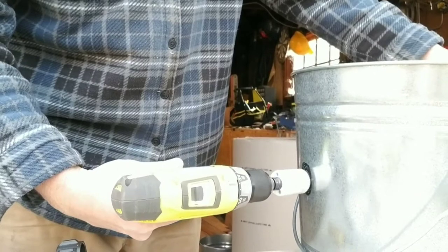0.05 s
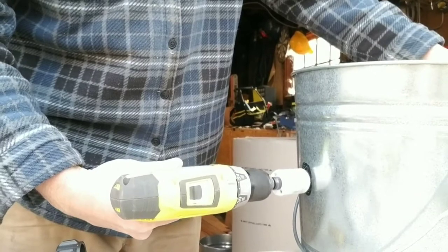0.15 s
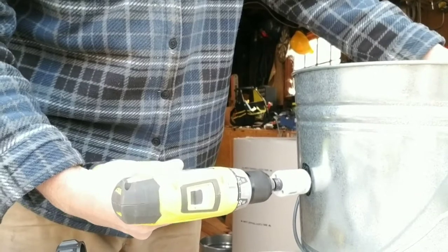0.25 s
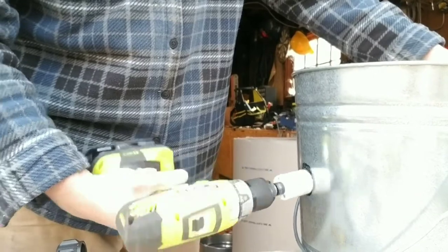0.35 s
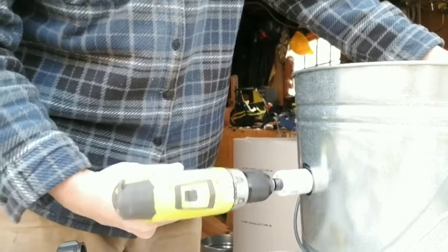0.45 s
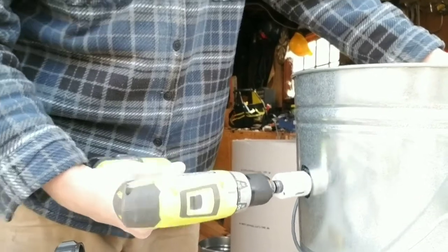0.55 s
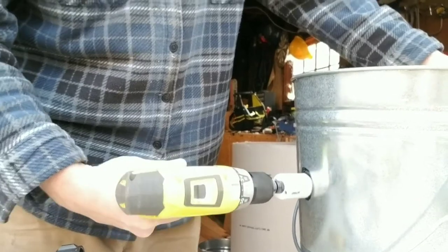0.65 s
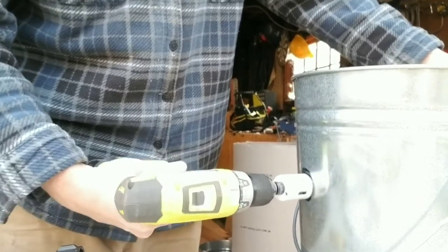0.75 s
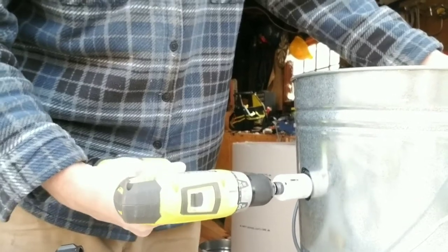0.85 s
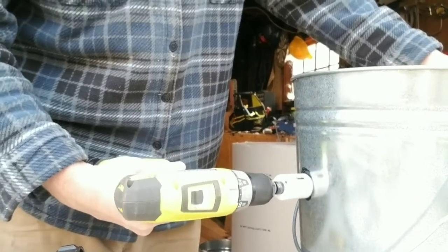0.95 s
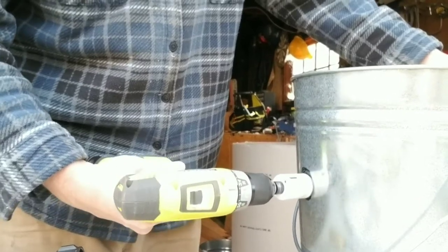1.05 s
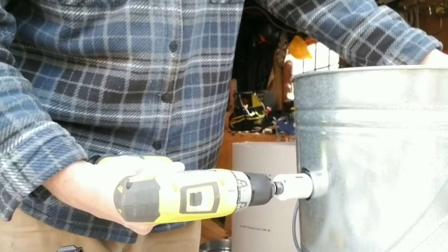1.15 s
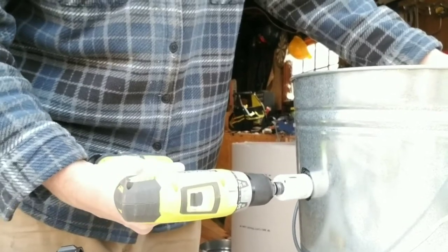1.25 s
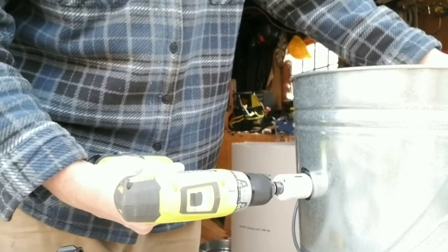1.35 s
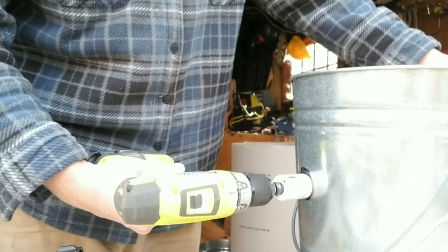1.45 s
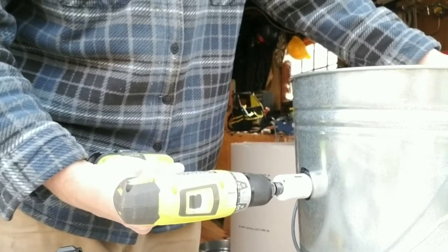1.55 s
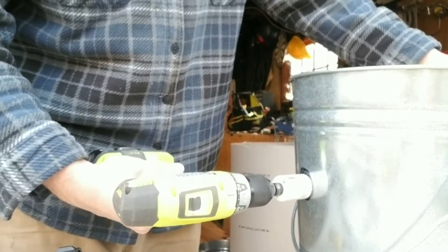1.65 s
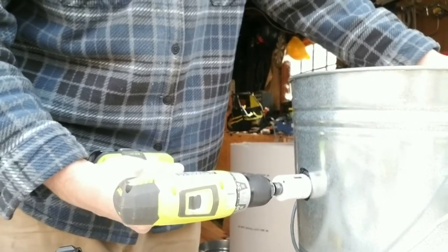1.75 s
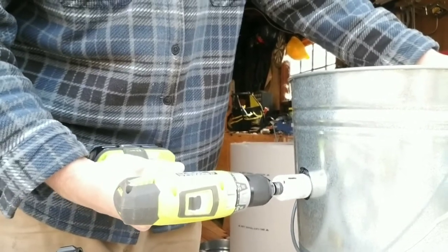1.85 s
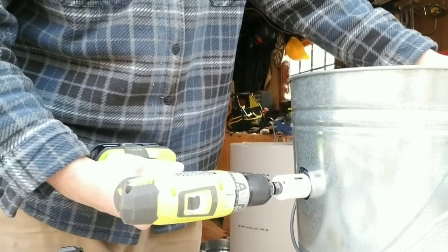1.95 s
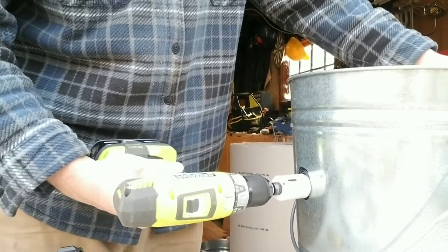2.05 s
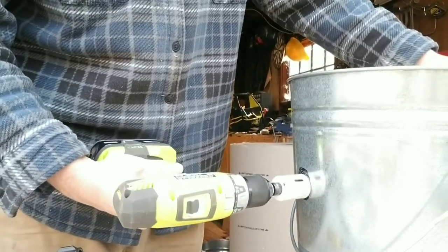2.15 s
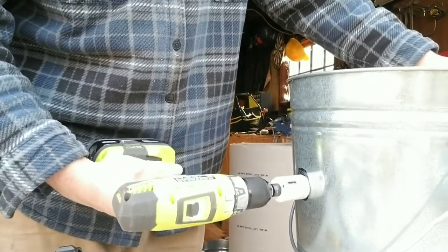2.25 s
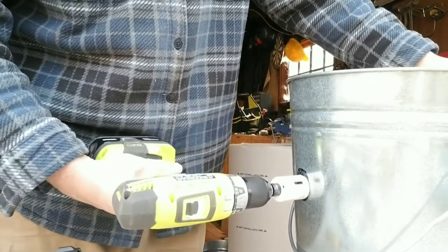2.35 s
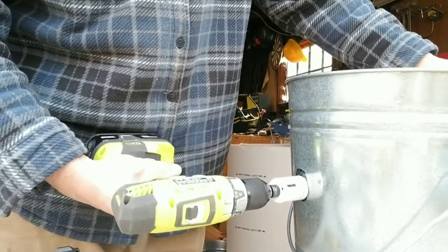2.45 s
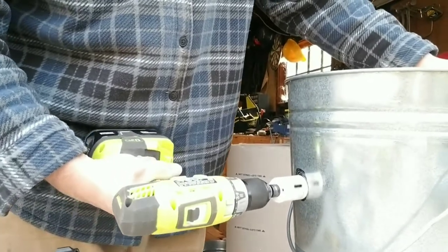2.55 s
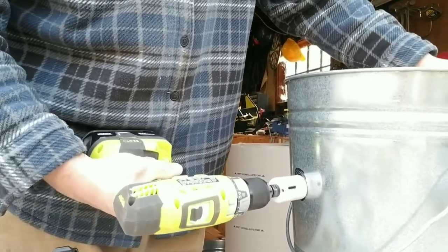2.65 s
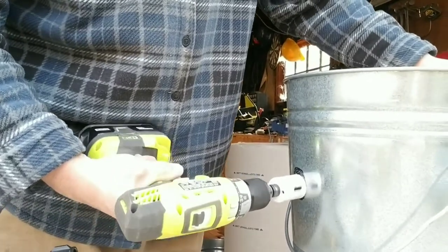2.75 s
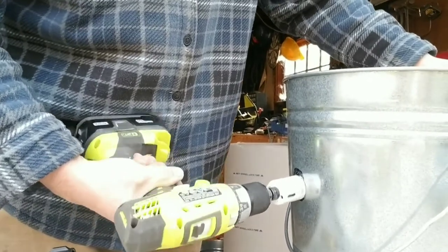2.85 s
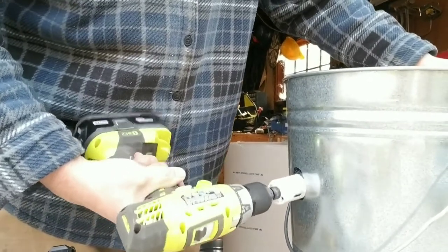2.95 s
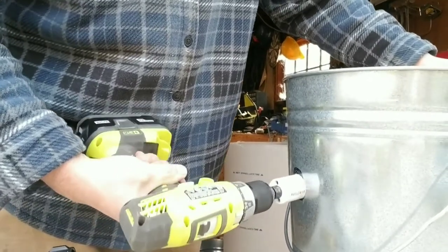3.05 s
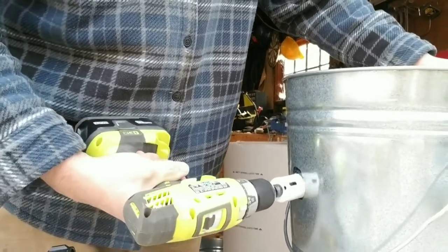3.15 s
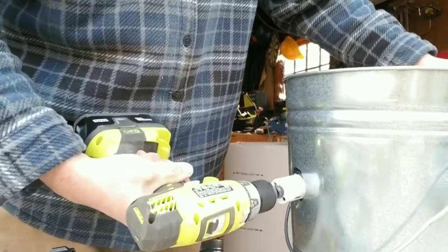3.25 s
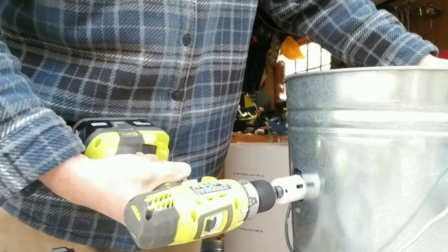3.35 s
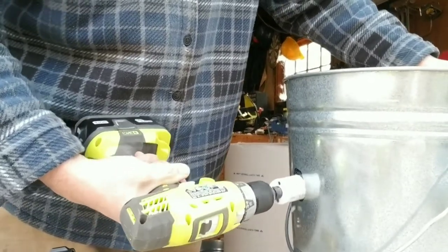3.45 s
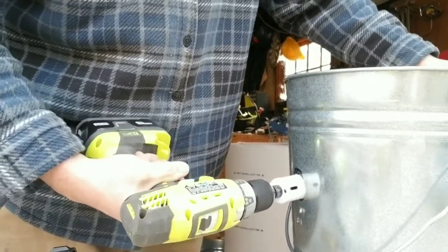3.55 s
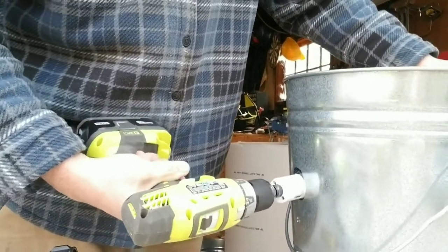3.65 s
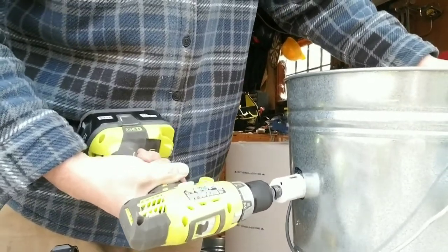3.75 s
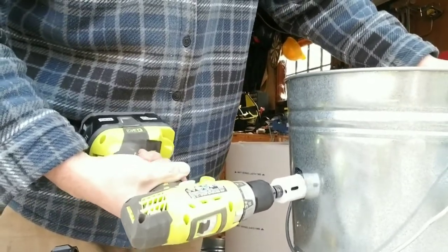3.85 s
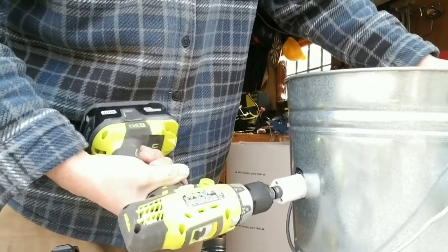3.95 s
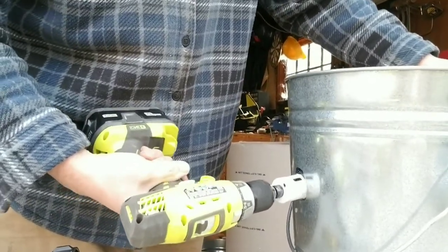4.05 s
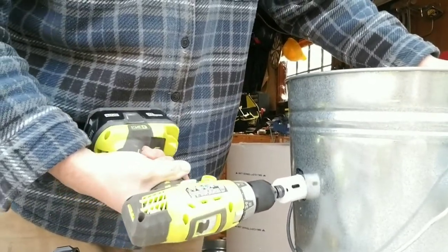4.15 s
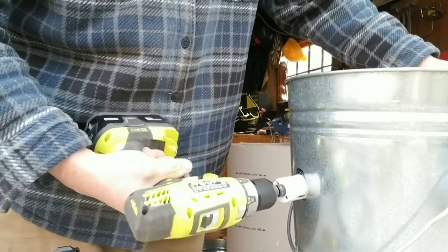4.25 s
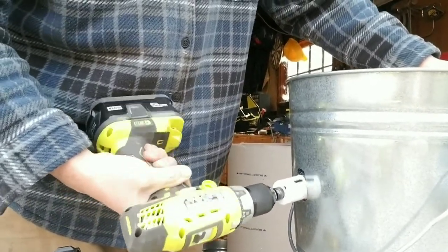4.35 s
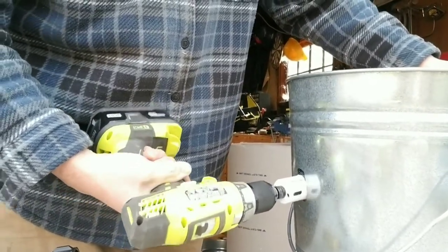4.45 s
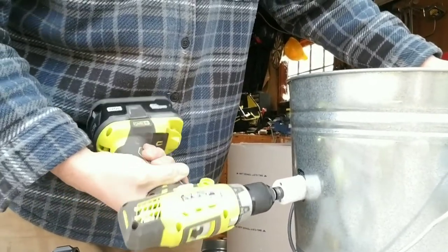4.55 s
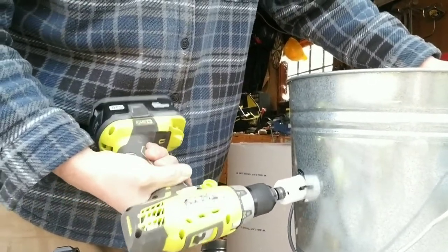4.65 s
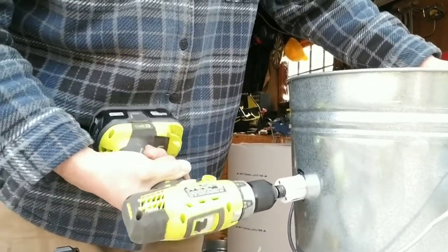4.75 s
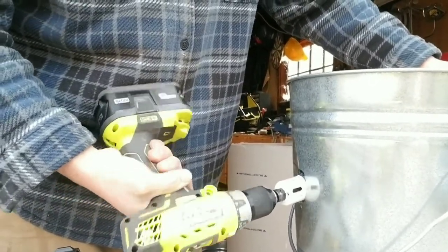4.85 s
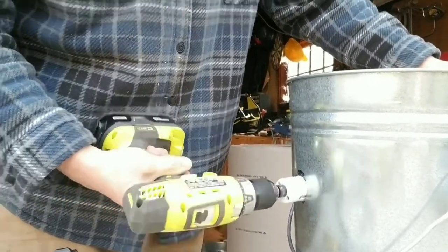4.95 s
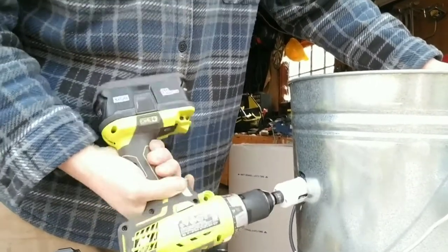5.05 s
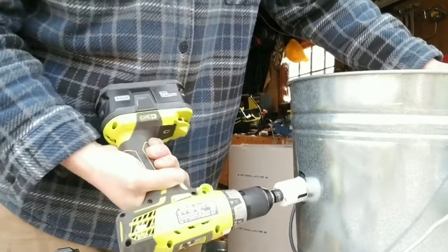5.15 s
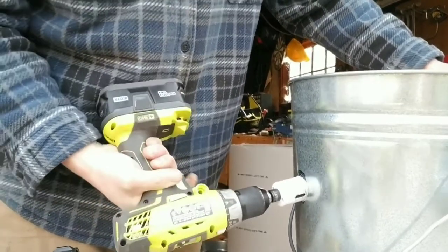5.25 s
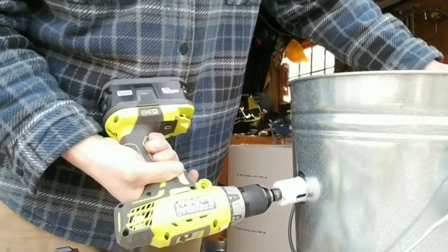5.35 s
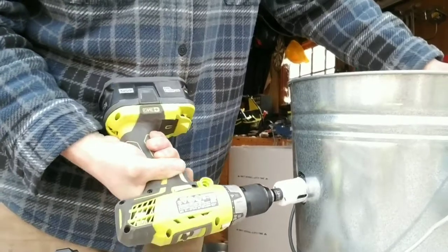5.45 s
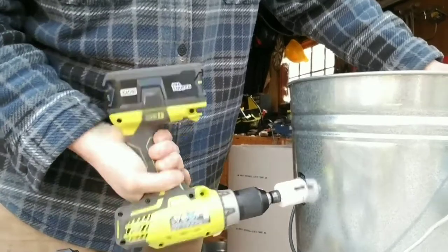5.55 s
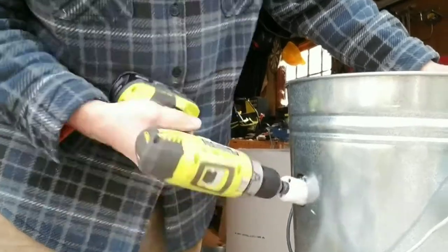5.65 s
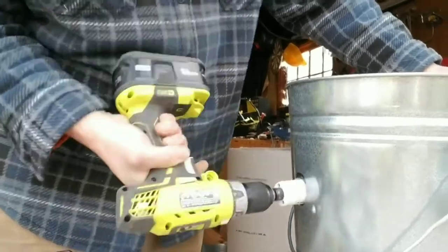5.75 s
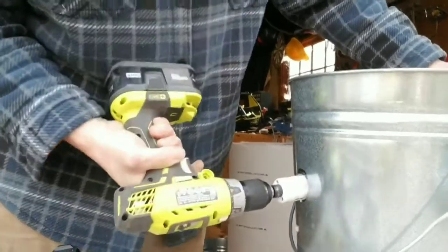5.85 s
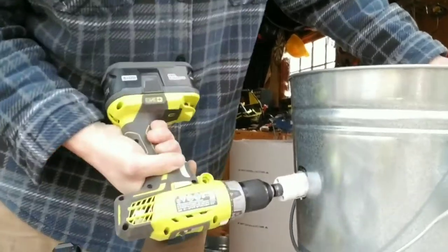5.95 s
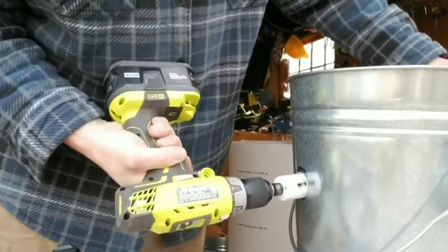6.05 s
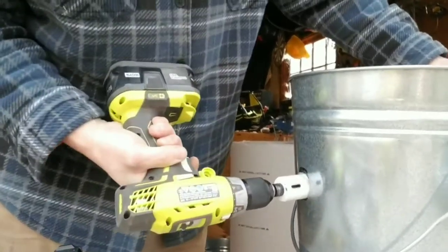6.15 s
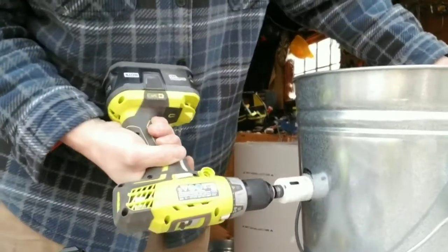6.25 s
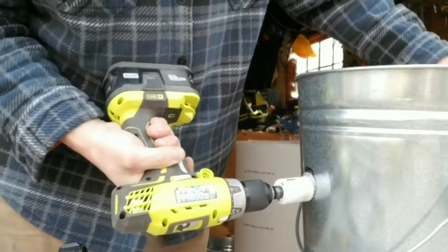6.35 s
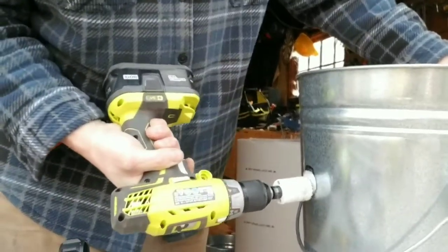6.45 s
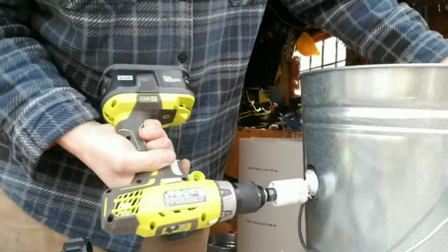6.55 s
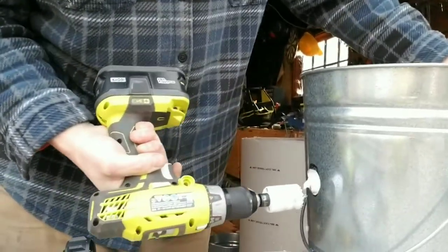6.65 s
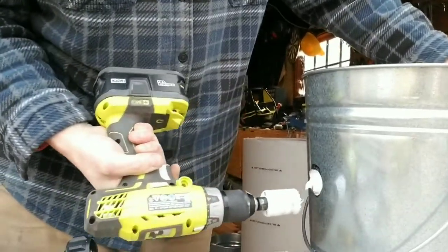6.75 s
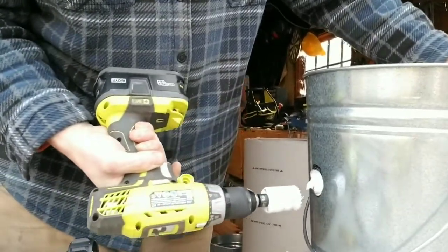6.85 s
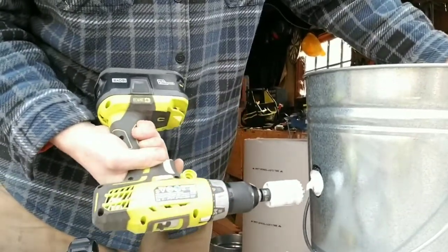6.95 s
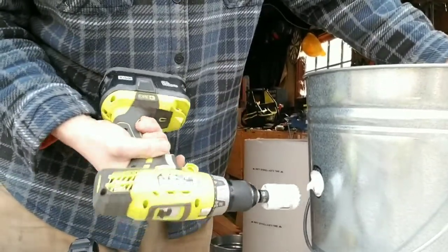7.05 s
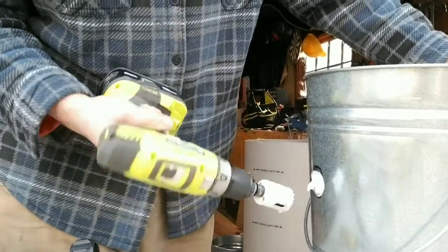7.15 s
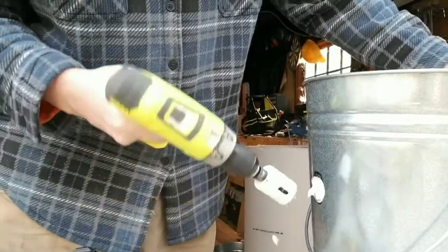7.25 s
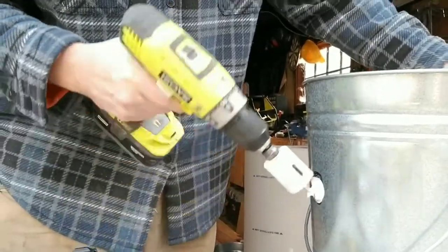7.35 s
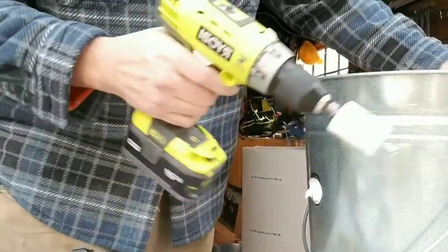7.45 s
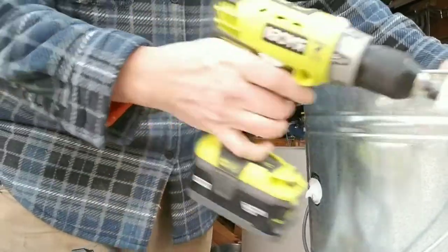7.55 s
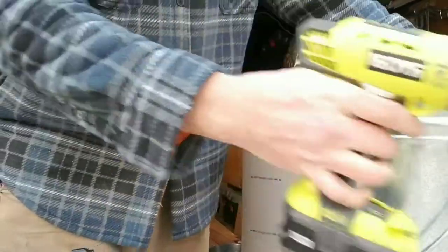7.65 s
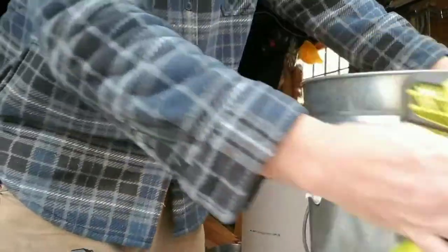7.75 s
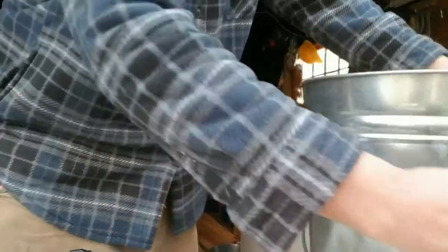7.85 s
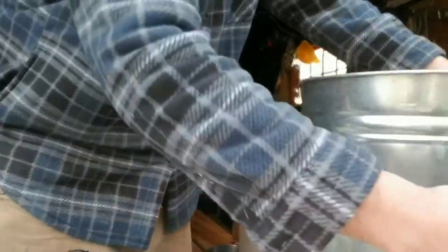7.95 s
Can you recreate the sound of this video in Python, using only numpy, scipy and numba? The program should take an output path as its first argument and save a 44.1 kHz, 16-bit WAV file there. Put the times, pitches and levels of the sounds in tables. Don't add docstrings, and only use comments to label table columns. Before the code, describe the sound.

A slow drill grinds through thin sheet metal in a small, fairly dry workshop, captured close in stereo. Brushes hiss, gears whine thinly and the bin booms and groans. Teeth begin snagging, banging and cracking in dense irregular clatter, then the tool coasts to a stop. Two brief bursts follow, the first with a sharp snag and rising whirr, then near quiet, light cloth rustle and a weighty set-down thump.

```python
import sys
import numpy as np
from scipy import signal
from scipy.fft import rfft, irfft
from scipy.io import wavfile
from scipy.ndimage import uniform_filter1d
from numba import njit

SR = 44100
rng = np.random.default_rng(int(sys.argv[2]) if len(sys.argv) > 2 else 0)


def to_wav(sig):
    pcm = np.clip(np.atleast_2d(sig), -1, 1) * 32767
    pcm = np.round(pcm).astype(np.int16)
    wavfile.write(sys.argv[1], SR, pcm.T)


def volts(x):
    e = np.asarray(x, float) / 20
    return 10 ** e


N = 353241

# frequency in Hz, level in dB per Hz.
SHEET = [(76, -43), (130, 0), (188, -9.5), (226, -4.5), (259, -7), (301, 3), (350, -4.5), (533, -4),
         (912, -19), (1100, -17), (1430, -32.5), (2420, -120)]


def unit(x):
    return x / np.sqrt(np.mean(x ** 2))


def colour(x, spectrum):
    hz, db = np.transpose(spectrum)
    bins = np.maximum(np.fft.rfftfreq(N, 1 / SR), 1)
    gain_db = np.interp(np.log(bins), np.log(np.maximum(hz, 1)), db)
    return irfft(rfft(x) * volts(gain_db), N)


def walk(rate):
    hold = int(SR / rate)
    steps = np.repeat(rng.standard_normal(N // hold + 1), hold)
    return unit(uniform_filter1d(uniform_filter1d(steps, hold), hold)[:N])


def curves(table):
    s, *columns = np.transpose(table)
    return [np.interp(np.arange(N) / SR, s, c, left=-120, right=-120) for c in columns]


@njit
def rings(start, hz, t60, size, turn, rise_s):
    out = np.zeros(N)
    hold = np.exp(-1 / (rise_s * SR))
    for k in range(len(start)):
        z = size[k] * np.exp(1j * turn[k])
        p = np.exp(2j * np.pi * hz[k] / SR - np.log(1000) / (t60[k] * SR))
        lack = 1.
        for i in range(max(int(start[k] * SR), 0), min(int((start[k] + t60[k]) * SR), N)):
            out[i] += z.imag * (1 - lack)
            z, lack = z * p, lack * hold
    return out


def grit(per_s, spread_db):
    hit = rng.random(N) < per_s / SR
    size = volts(spread_db * np.minimum(rng.exponential(size=N), 3.5))
    return unit(hit * rng.standard_normal(N) * size)


def resonate(x, modes, swell_db, rate):
    out = 0
    for hz, width, db in modes:
        b, a = signal.iirpeak(hz, hz / width, fs=SR)
        out = out + volts(db + swell_db * walk(rate)) * unit(signal.lfilter(b, a, x))
    return unit(out)


def puffs(table, attack_s, decay_s):
    t = np.arange(int(.1 * SR)) / SR
    rows = np.array(table)
    marks = np.zeros(N)
    np.add.at(marks, (rows[:, 0] * SR).astype(int), volts(rows[:, 1]))
    return signal.fftconvolve(marks, (1 - np.exp(-t / attack_s)) * np.exp(-t / decay_s))[:N]


def tones(table, edge_s, waver):
    t, out = np.arange(N) / SR, 0
    drift = np.cumsum(waver * walk(60)) / SR
    for s, length, hz, db in table:
        gate = np.clip(np.minimum(t - s + edge_s, s + length + edge_s - t) / (2 * edge_s), 0, 1)
        out = out + volts(db) * gate * np.sin(2 * np.pi * hz * (t + drift))
    return out


def shop():
    # frequency in Hz, level in dB per Hz.
    room_tone = [(15, -46), (25, -1.5), (76, -0.5), (145, -8), (175, -3.5), (200, -14), (308, -19),
                 (426, -24), (474, -24.5), (514, -27.5), (558, -22), (1320, -28), (1640, -29.5),
                 (2530, -46.5), (15900, -73)]
    # frequency in Hz, side over mid in dB.
    room_width = [(60, -28), (200, -13), (700, 0.5), (15000, 1.5)]
    mid, side = (colour(rng.standard_normal(N) * volts(0.65 * walk(0.93)), room_tone) for _ in range(2))
    return volts(-45) * np.array([mid, colour(side, room_width)]) / np.std(mid)


def boom_db(scrape_db):
    # time in seconds, level in dB.
    jolts = [(.03, -21.5), (.17, -26), (.27, -27.5), (.42, -25.5), (.54, -27.5), (.68, -28.5), (.78, -35.5),
             (.92, -27), (1.02, -24.5), (1.14, -25.5), (1.22, -25), (1.46, -32.5), (1.55, -30.5),
             (1.67, -27.5), (1.79, -26.5), (1.97, -27.5), (2.07, -29.5), (2.31, -33), (2.51, -28.5),
             (2.67, -31), (2.87, -26.5), (3.01, -30), (3.13, -26.5), (3.26, -33), (3.4, -29), (3.6, -34),
             (3.74, -27.5), (3.86, -30.5), (3.97, -28), (4.11, -22), (4.3, -26), (4.41, -25), (4.56, -27),
             (4.62, -26.5), (4.72, -30.5), (4.91, -23.5), (4.99, -24), (5.55, -27.5), (5.67, -26),
             (6.2, -36)]
    rise_db_s, sag_db_s, over_scrape_db = 200, 73, 7.5
    t = np.arange(N) / SR
    swells = [db - np.where(t < s, rise_db_s * (s - t), sag_db_s * (t - s)) for s, db in jolts]
    rest = -40 - 15 * np.abs(t - 5.9)
    return np.maximum(np.minimum(np.max(swells, axis=0), scrape_db + over_scrape_db), rest)


def drone(db, scrape_db):
    # time in seconds, lowest mode in Hz.
    boom_hz = [(0, 100), (1.0, 96), (2.5, 98), (3.1, 90), (4.6, 98), (5.0, 90), (5.8, 88), (6.2, 78),
               (6.9, 76)]
    hz = np.interp(np.arange(N) / SR, *np.transpose(boom_hz))
    swell = volts(1.8 * walk(30))
    mode = swell * np.sin(2 * np.pi * np.cumsum(hz * (1 + 0.035 * walk(14))) / SR)
    rumble = colour(rng.standard_normal(N),
                    [(20, -38.5), (40, -12.0), (60, 25.0), (80, 20.5), (130, 21.0), (200, -38.5)])
    rumble_gain = volts(0.5 * db + 0.32 * scrape_db - 13.0) * (db > -70)
    return volts(db + 2.5) * mode + rumble_gain * unit(rumble)


def stick_db(bites):
    stick_s = .012
    held = np.zeros(N)
    held[((bites[:, 0] - stick_s / 2) * SR).astype(int)] = 1
    return -9 * np.minimum(np.convolve(held, np.hanning(int(stick_s * SR)), "same"), 1)


def scrape(db):
    # frequency in Hz, width in Hz, level in dB.
    panel = [(235.3, 10, 1.5), (275, 130, 5), (339, 81, 2), (420, 68, 3.5), (490, 47, -16.5),
             (560, 59, -24), (690, 40, -20), (774, 13, -20)]
    nicks = grit(2500, 1.67) * volts(1.34 * walk(24.88))
    ringing = resonate(nicks, panel, 3.2, 9)
    return volts(db + .5) * unit(unit(colour(nicks, SHEET)) + volts(-3.5) * ringing)


def motor(housing_db, hiss_db):
    # time in seconds, pitch in Hz, level in dB.
    mesh = [
        (0, 4180, -36),
        (.17, 4200, -40.5),
        (.3, 3780, -56.5),
        (.55, 4000, -52),
        (1.1, 4040, -56),
        (1.3, 3980, -43),
        (1.7, 3845, -42.5),
        (2.4, 3850, -41.5),
        (2.7, 3660, -44),
        (3, 3830, -50.5),
    ]
    # frequency in Hz, width in Hz, level in dB.
    shell_modes = [(1370, 80, -8), (1505, 160, -0.5), (2034, 70, -3.5), (2185, 110, -2), (2400, 90, -3),
                   (2580, 140, -2)]
    # frequency in Hz, level in dB per Hz.
    housing_spectrum = [(600, -33.5), (950, -9.5), (1170, -2), (1500, 3), (1800, -3), (2100, 2), (2600, 1),
                        (3000, -3.5), (3500, -14.5)]
    # frequency in Hz, level in dB per Hz.
    hiss_spectrum = [(2700, -17.5), (3200, -2), (3480, -0.5), (3830, 1.5), (4400, -4), (5100, -1.5),
                     (5400, -3), (5550, -8.5), (5800, -4), (6450, -5.5), (8150, -4), (8900, -8.5),
                     (11600, -4.5), (15800, -6), (16300, -40)]
    t = np.arange(N) / SR
    wobble_db = 0.64 * np.sin(2 * np.pi * 9.5 * t + 3.1 * walk(1.98)) + 0.61 * walk(30)
    gears = grit(6000, 0.78)
    shell = resonate(gears, shell_modes, 5.5, 14)
    housing = volts(housing_db) * unit(unit(colour(gears, housing_spectrum)) + volts(-6.5) * shell)
    hiss = volts(hiss_db - 1.5) * unit(colour(grit(15000, 0.4), hiss_spectrum))
    hz, db = curves(mesh)
    waver = .006 * np.minimum(t / .6, 1) * walk(60) + .001 * walk(40)
    turn = 2 * np.pi * np.cumsum(hz * (1 + waver)) / SR
    first_stage = volts(db + 1.1 * walk(15)) * np.sin(turn)
    slower_stage = (t > .5) * volts(db - 1.5 + 3.0 * walk(7.95)) * np.sin(.828 * turn)
    return volts(wobble_db) * (housing + hiss) + first_stage + slower_stage


def groans():
    # start in seconds, length in seconds, pitch in Hz, level in dB.
    binds = [(.02, 0.24, 337, -32.5), (5.505, 0.015, 240, -13), (5.88, 0.012, 197, -27.5),
             (5.9, 0.015, 146, -28), (5.78, .02, 230, -36.5), (5.835, .01, 750, -45), (.245, .02, 500, -19),
             (.76, .03, 245, -23), (1.43, .04, 220, -22), (1.72, 0.14, 232, -28), (.3, 0.023, 290, -15),
             (.41, 0.045, 305, -16.5), (.51, 0.054, 292, -17.5), (.63, 0.04, 245, -24),
             (1.63, 0.034, 230, -19), (2.705, 0.017, 233, -11), (2.845, 0.043, 231.3, -14.5),
             (3.94, 0.023, 300, -14), (4.385, 0.022, 288.5, -13.5), (4.825, 0.053, 246, -13),
             (4.895, 0.022, 115, -12.5), (4.88, .02, 250, -19), (4.77, .012, 225, -18),
             (4.788, .014, 215, -16), (4.625, .04, 225, -20), (4.855, .015, 190, -18),
             (3.885, .02, 300, -18), (.03, .1, 165, -36), (1.05, .05, 300, -25), (1.95, .04, 430, -25),
             (4.7, .04, 420, -22.5), (4.725, 0.028, 290, -19), (.66, 0.043, 235, -23.5),
             (1.25, .05, 400, -25), (1.9, .05, 330, -25), (3.62, .06, 290, -22.5),
             (4.975, 0.021, 194, -19.5)]
    return tones(binds, 0.013, 0.025)


def teeth():
    # time in seconds, peak in dB, ring in Hz, edge crack from about 700
    # Hz up in dB re peak.
    hard_catches = [(2.7, -6, 440, -11), (2.788, -8.5, 316, -3.5), (2.868, -7, 710, -2),
                    (2.91, -6, 447, -0.5), (2.927, -4, 590, -3.5), (2.992, -1.5, 599, -14.5),
                    (3.009, -6, 398, -5), (3.037, -3.5, 640, -5.5), (3.086, -8.5, 580, -4),
                    (3.146, -7, 401, -2), (3.174, -17.5, 504, 4), (3.601, -8.5, 330, -7.5),
                    (3.617, -8.5, 406, -6), (3.739, -8.5, 715, -16), (3.798, -3, 748, -10.5),
                    (3.851, -10.5, 613, -6), (3.98, -6.5, 318, -13.5), (4.027, -3.5, 690, -8),
                    (4.068, -8.5, 490, -7), (4.109, -6.5, 690, -11), (4.162, -10.5, 620, -5),
                    (4.24, 0.5, 483, -8), (4.299, 0, 814, -7.5), (4.352, -2.5, 720, -8),
                    (4.416, -5, 576, -12.5), (4.464, -1, 676, -10.5), (4.657, -1.5, 606, -13.5),
                    (4.772, -7, 620, -7), (4.819, -5.5, 260, -7), (4.905, -6.5, 460, -7)]
    snags = [(0.254, -11, 477, -15.5), (3.295, -12.5, 474, -13), (4.976, -12.5, 520, -7),
             (5.054, -27.5, 185, -12.5), (5.501, -8, 260, -9.5), (5.516, -4, 860, -5),
             (5.634, -12.5, 466, -20), (5.653, -12, 542, -21), (5.696, -10.5, 520, -13.5),
             (5.44, -37, 400, -4), (5.575, -18, 600, -15), (5.877, -30.5, 330, -25), (6.128, -41, 490, -7),
             (6.171, -30.5, 470, 3), (6.215, -26.5, 450, -2), (6.238, -19, 432, -11.5),
             (6.268, -33, 290, -12)]
    # time in seconds, peak
    # in dB, ring in Hz.
    lesser_teeth = [(2.719, -9, 263), (2.741, -13.5, 462), (2.775, -9.5, 489), (2.814, -12.5, 315),
                    (2.827, -12.5, 635), (2.841, -11, 221), (2.879, -10, 266), (2.898, -3, 457),
                    (2.948, -9, 559), (2.958, -12.5, 608), (3.052, -12.5, 231), (3.069, -19.5, 538),
                    (3.107, -15.5, 344), (3.128, -7.5, 633), (3.197, -9, 298), (3.222, -15.5, 479),
                    (3.361, -17.5, 400), (3.424, -19, 306), (3.458, -19.5, 624), (3.489, -16.5, 403),
                    (3.5, -12.5, 296), (3.553, -20, 500), (3.565, -21.5, 484), (3.641, -18, 290),
                    (3.665, -18.5, 452), (3.685, -17, 446), (3.72, -15.5, 360), (3.75, -15, 285),
                    (3.771, -15.5, 812), (3.784, -10.5, 759), (3.817, -11, 479), (3.834, -9, 436),
                    (3.867, -7.5, 802), (3.885, -7, 576), (3.922, -6, 360), (3.94, -11.5, 450),
                    (3.963, -12.5, 322), (3.991, -8.5, 425), (4.013, -23, 645), (4.041, -9, 436),
                  (4.082, -12, 446), (4.123, -6, 274), (4.137, -12, 425), (4.179, -9.5, 462),
                  (4.189, -18.5, 495), (4.202, -13, 672), (4.219, -8.5, 398), (4.259, -0.5, 624),
                  (4.278, -1, 640), (4.316, -6.5, 290), (4.338, -6, 872), (4.387, -4.5, 495),
                  (4.402, -1, 349), (4.427, -12, 651), (4.449, -12, 672), (4.485, -7, 436),
                  (4.502, -8.5, 662), (4.515, -6.5, 662), (4.53, -8, 834), (4.549, -8, 317),
                  (4.565, -4, 430), (4.58, -13, 317), (4.593, -4.5, 220), (4.616, -7.5, 274),
                  (4.634, -2, 290), (4.675, -4.5, 441), (4.688, -9.5, 484), (4.699, -8.5, 392),
                  (4.712, -3.5, 317), (4.73, -4, 506), (4.748, -11, 436), (4.76, -13, 220),
                  (4.789, -4, 285), (4.806, -25, 484), (4.839, -4.5, 242), (4.861, -7.5, 220),
                  (4.881, -9.5, 279), (4.896, -5.5, 312), (4.92, -8, 473), (4.931, -17, 586),
                  (4.961, -18, 220)]
    s, db, hz = np.transpose(lesser_teeth)
    edge_db = -9.0 + 2.5 * np.clip(rng.standard_normal(len(s)), -2, 2)
    return np.concatenate([hard_catches + snags, np.transpose([s, db - 3.0, hz, edge_db])])


def catches(bites):
    # frequency in Hz, level in dB re edge, t60 in seconds.
    edge_rings = [(800, 7, .013), (1080, 1, .01), (1433, -1, 0.017)]
    s, db, hz, edge_db = bites.T
    chance = rng.random((len(s), 6)).T
    half_turn = np.pi + 0 * s
    thump = rings(s + 0.00054, 235 + 30 * chance[5], 0.031 + 0 * s, volts(db - 5.5), half_turn, 0.00076)
    snap_back = rings(s + .0012, 520 + 260 * chance[4], 0.0066 + 0 * s, volts(db - 3.0), half_turn, 0.00018)
    out = thump + snap_back
    for k, (ratio, mode_db, cycles) in enumerate([(1.0, -1.5, 14.5), (1.5, -11.0, 10.0)]):
        pitch = hz * ratio * (0.961 + 0.089 * chance[k])
        phase = 2 + 2 * chance[k + 2]
        out = out + rings(s - .001, pitch, cycles / pitch, volts(db + mode_db), phase, 0.00048)
    for ring_hz, ring_db, t60 in edge_rings:
        pitch = ring_hz * (0.862 + 0.22 * chance[5])
        out = out + rings(s + .0008, pitch, t60 + 0 * s, volts(db + edge_db + ring_db), half_turn, 0.0003)
    shudder = puffs(bites, 0.0023, 0.0056) * unit(colour(grit(3000, 2.6), SHEET))
    edge = unit(colour(rng.standard_normal(N), [(450, -35.0), (780, 8.0), (1000, 6.5), (1450, 1.5),
                                                (2500, -5.0), (6000, -8.5), (15000, -42.5)]))
    crack = puffs(np.transpose([s, db + edge_db]), 0.0012, 0.0034) * edge
    return out + volts(-9) * shudder + volts(-4.5) * crack


def spits():
    # time in seconds, peak in dB.
    bursts = [(0.2594, -16), (2.8973, -14.5), (3.01, -15.5), (3.128, -13.5), (3.146, -28.5),
              (3.2944, -26.5), (3.6022, -18), (3.948, -12.5), (4.1026, -17), (4.2674, -12), (4.2975, -24),
              (4.3874, -16), (4.556, -14.5), (4.573, -17.5), (4.8978, -17.5), (5.1794, -46), (5.5145, -10),
              (6.2183, -33.5)]
    bright = unit(colour(rng.standard_normal(N), [(2500, -0.5), (5000, -6.0), (9000, -13.5), (16000, -11.0)]))
    return volts(2) * puffs(bursts, 0.0037, 0.0067) * bright


def squeals():
    # start in seconds, length in seconds, pitch in Hz, level in dB.
    thin_tones = [
        (3.957, .06, 11060, -40),
        (4.135, .065, 11290, -41),
        (4.475, .06, 11300, -45),
        (5.005, .055, 11200, -61),
        (5.125, .055, 7757, -67),
        (5.125, .055, 15509, -64),
        (5.72, .07, 11200, -60),
    ]
    return tones(thin_tones, .004, .001)


def whirr():
    # time in seconds, pitch in Hz, level in dB.
    spin_up = [
        (5.57, 1758, -51),
        (5.6, 1900, -39.5),
        (5.63, 2150, -31),
        (5.655, 2350, -38),
        (5.69, 2610, -45),
    ]
    hz, db = curves(spin_up)
    turn = 2 * np.pi * np.cumsum(hz * (1 + .03 * walk(150))) / SR
    return volts(db + 3.0 * walk(120)) * np.sin(turn)


def sleeve():
    # time in seconds, level in dB.
    rustle = [(6.5, -80), (7.25, -83), (7.31, -74), (7.42, -68.5), (7.52, -67), (7.58, -74), (7.69, -69),
              (7.834, -70), (7.864, -56), (7.904, -65), (8.0, -68)]
    # time in seconds, peak in dB.
    ticks = [(6.3, -52), (6.345, -54), (6.39, -54), (6.43, -56), (6.555, -62), (6.69, -60), (6.715, -60.5),
             (7.365, -59), (6.81, -60), (7.43, -64), (7.49, -61), (7.51, -59), (7.6, -64), (7.655, -63),
             (7.69, -64), (7.725, -61), (7.925, -55)]
    cloth = unit(colour(grit(5000, 2.0), [(1500, 6.5), (3000, 4.0), (3350, 6), (3700, -1.5),
                                          (8000, -4.5), (16000, -2.5)]))
    tick = unit(colour(rng.standard_normal(N), [(400, 0.5), (1500, 6), (4000, -8), (8000, -9.5), (16000, -19.5)]))
    return volts(curves(rustle)[0] + 1.5 * walk(25)) * cloth + puffs(ticks, .001, .006) * tick


def set_down():
    # time in seconds, peak in dB.
    landings = [
        (6.688, -36),
        (7.682, -38),
        (7.856, -4.5),
        (7.865, -15),
        (7.925, -27),
    ]
    # frequency in Hz, level in dB, t60 in seconds.
    bench = [(62.7, -13, 0.26), (118, 5.5, 0.03), (149, -5, 0.04), (244, -8.5, 0.088), (330, -12.5, 0.09),
             (452, -21, 0.1), (875, -43.5, 0.036), (1810, -39, .03)]
    s, db = np.transpose(landings)
    thud = 0
    for hz, mode_db, t60 in bench:
        thud = thud + rings(s, hz + 0 * s, t60 + 0 * s, volts(db + mode_db), np.pi + 0 * s, 0.0061)
    wood = unit(colour(rng.standard_normal(N), [(80, -27.0), (150, 13.0), (300, -10.0), (550, -19.5),
                                                (1000, -24.5), (2500, -63)]))
    loose = unit(colour(grit(4000, 1.8), [(400, 2.5), (1800, 3.0), (3000, -10), (7500, -8), (16000, -35.0)]))
    shudder = volts(-15.0) * puffs(landings, .006, 0.032) * wood
    rattle = volts(-38.5) * puffs(landings, 0.0024, 0.018) * loose
    return volts(4.5) * thud + shudder + rattle


def near(bites):
    # time in seconds, feed pressure as tooth scrape in dB,
    # motor effort as brush and fan hiss in dB.
    cut = [(0.0, -31, -30.5), (0.2, -31.5, -27.5), (0.27, -24.5, -30.5), (0.81, -25.5, -30),
           (1.95, -22.5, -29), (2.04, -26.5, -30), (2.64, -25, -29), (2.914, -20.5, -29.5),
           (3.22, -26.5, -36.5), (3.354, -33.5, -44), (3.58, -27.5, -37), (3.978, -20.5, -36),
           (4.19, -25.5, -36), (4.234, -21, -33)]
    stop = [
        (4.93, -25, -35),
        (4.995, -31, -36),
        (5.03, -44, -66),
        (5.115, -52, -54),
        (5.14, -49.5, -82),
        (5.288, -55.5, -85),
    ]
    first_squeeze = [
        (5.41, -60, -68),
        (5.43, -55, -70),
        (5.46, -37, -41),
        (5.49, -31.5, -32),
        (5.54, -34.5, -34.5),
        (5.658, -20.5, -33),
        (5.71, -42, -50),
        (5.745, -45.5, -81),
        (5.93, -60.5, -83.5),
    ]
    second_squeeze = [
        (5.95, -55.5, -64),
        (6.004, -39, -39.5),
        (6.13, -33, -34.5),
        (6.16, -43, -49.5),
        (6.24, -32.5, -59.5),
        (6.268, -49, -55),
        (6.46, -58.5, -63),
        (6.5, -66, -72.5),
        (6.8, -65.5, -93),
    ]
    scrape_db, hiss_db = curves(cut + stop + first_squeeze + second_squeeze)
    housing_db = 0.32 * scrape_db + .65 * hiss_db - 1.85
    bin_wall = drone(boom_db(scrape_db), np.maximum(scrape_db, -55))
    drill = bin_wall + scrape(scrape_db + stick_db(bites)) + motor(housing_db, hiss_db)
    return drill + groans() + catches(bites) + spits() + squeals() + whirr() + sleeve() + set_down()


def scene():
    # frequency in Hz, side over mid in dB.
    close_width = [(40, -9.5), (70, -10.5), (130, -22.5), (250, -16.5), (450, -12), (800, -11), (1100, -1),
                   (1500, -3), (2400, -2.5), (4400, 2.5), (8100, 0), (15000, 0)]
    share = .14
    t = np.arange(int(.3 * SR)) / SR
    walls = rng.standard_normal((2, len(t))) * np.exp(-np.log(1000) * t / 0.095)
    bites = teeth()
    front, other = near(bites), near(bites)
    side = np.sqrt(1 - share) * other - np.sqrt(share) * signal.hilbert(front).imag
    dry = np.array([front, colour(side, close_width)])
    wet = signal.fftconvolve(dry, walls / np.linalg.norm(walls[0]), axes=1)[:, :N]
    mid, side = dry + volts(-14) * wet + shop()
    return np.array([mid + side, mid - side])


def low_pass(x):
    return signal.sosfilt(signal.butter(12, 16020, fs=SR, output="sos"), x)


def record(dry):
    trimmed = signal.sosfilt(signal.butter(2, 45, "high", fs=SR, output="sos"), dry)
    limited = 1.1 * np.tanh(trimmed / 1.1)
    top_cut = signal.ellip(10, .2, 70, 16000, fs=SR, output="sos")
    return low_pass(signal.sosfilt(top_cut, limited))


dry = scene()
out = record(dry)
to_wav(out)
```